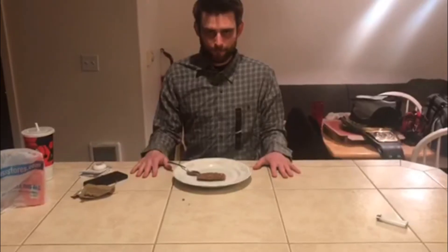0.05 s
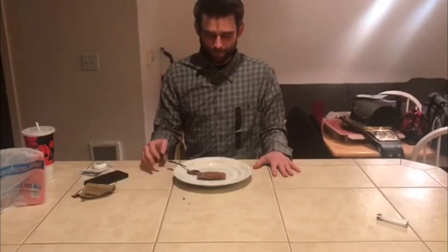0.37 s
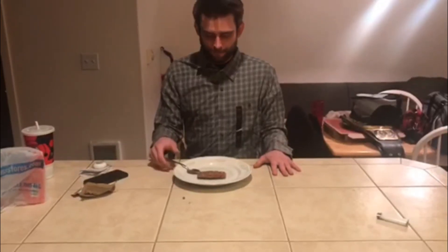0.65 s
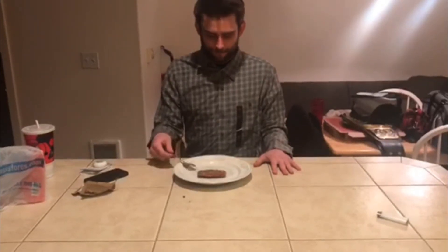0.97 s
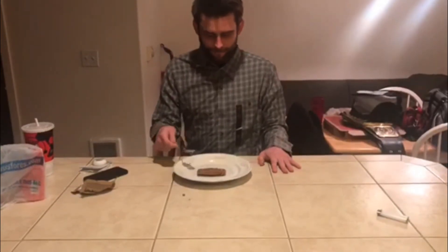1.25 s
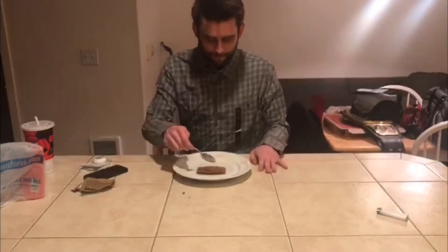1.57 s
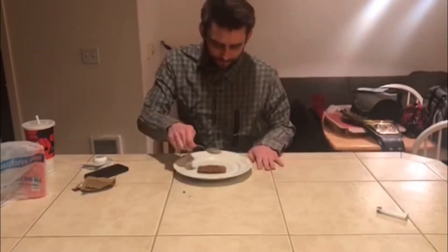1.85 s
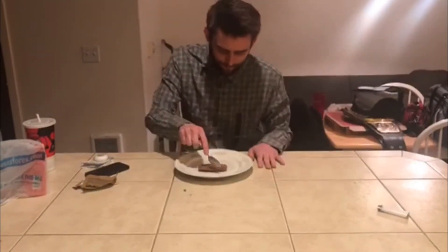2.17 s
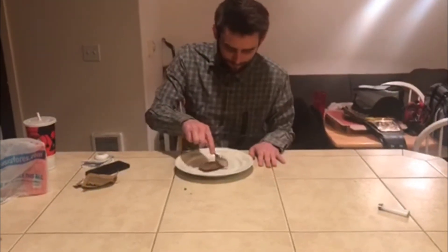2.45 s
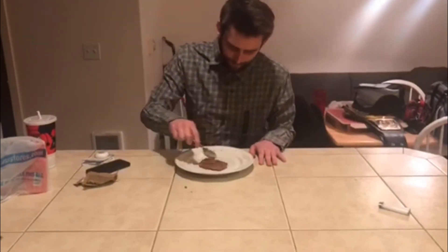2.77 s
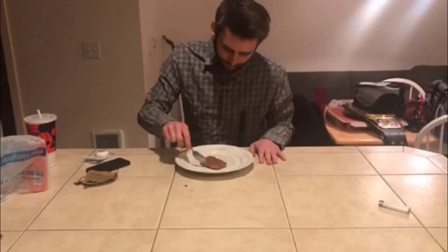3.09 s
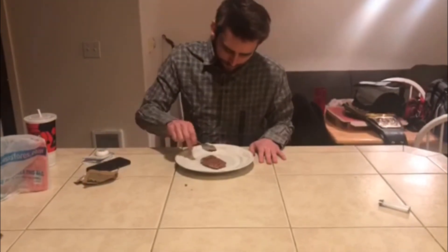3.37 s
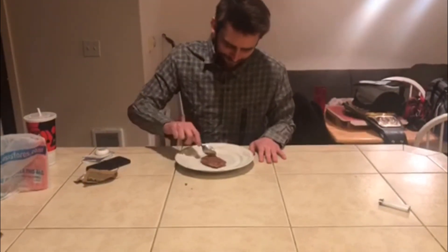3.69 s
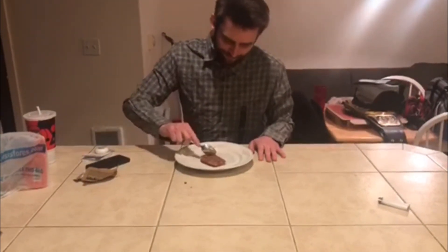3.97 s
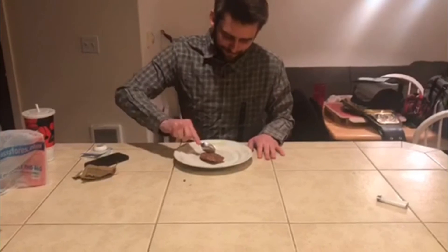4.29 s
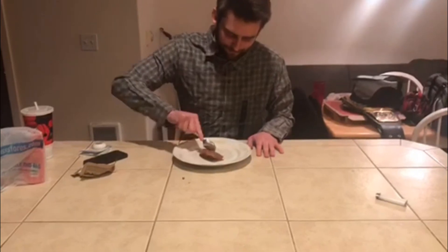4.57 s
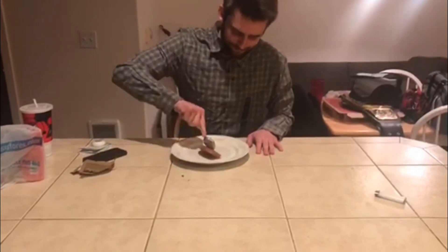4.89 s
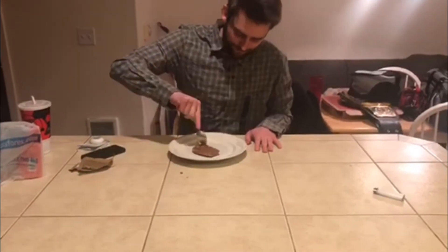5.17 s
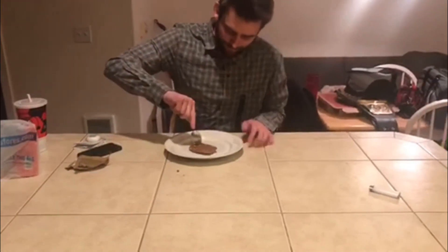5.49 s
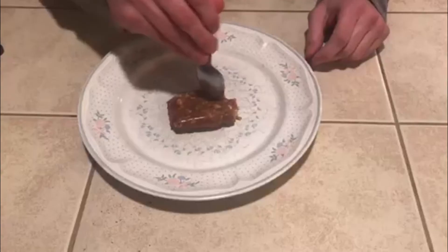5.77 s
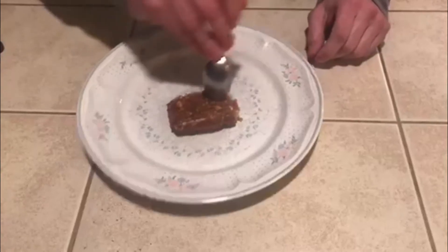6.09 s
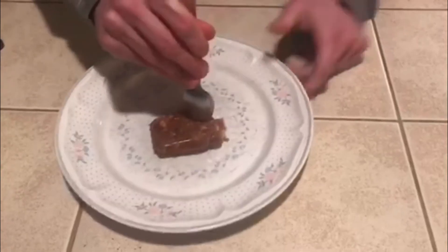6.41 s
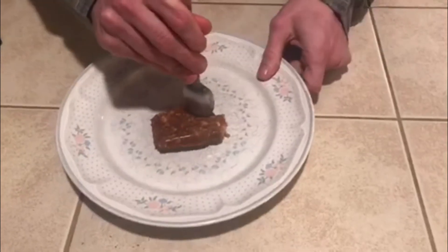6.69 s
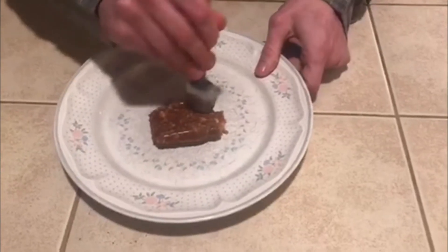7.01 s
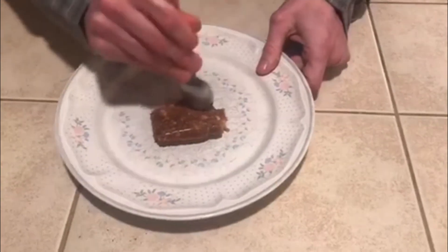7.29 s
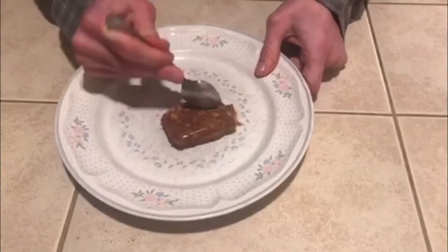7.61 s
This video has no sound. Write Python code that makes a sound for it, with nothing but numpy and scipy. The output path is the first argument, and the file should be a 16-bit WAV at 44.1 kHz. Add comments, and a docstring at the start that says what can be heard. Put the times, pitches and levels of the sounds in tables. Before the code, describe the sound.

A spoon pressed into a hard bar slips and skids on a plate, knocking it against a tiled table, louder toward the end.

```python
"""In a quiet kitchen, a metal spoon knocks and clinks as it is picked up from a ceramic plate.
Sleeves and hands brush. Pushed into a hard bar, the spoon sticks and slips over the glaze, making the
rim sing, and knocks the plate against the tiled table. After five seconds its edge squeaks twice.
For the last two seconds we listen from just above the plate instead of across the table:
the spoon skids hard, a hand steadies the plate, and a run of loud knocks ends the scene."""
import sys
import numpy as np
from scipy import signal
from scipy.fft import rfft, irfft
from scipy.io import wavfile
from scipy.ndimage import uniform_filter1d

SR = 44100
rng = np.random.default_rng(int(sys.argv[2]) if len(sys.argv) > 2 else 0)


def generate_wav(sig):
    """Save sig (samples, or channels by samples) to the path in sys.argv[1] as 16-bit PCM at SR."""
    pcm = np.round(np.clip(np.atleast_2d(sig).T, -1, 1) * 32767).astype(np.int16)
    wavfile.write(sys.argv[1], SR, pcm)


N = 346185
T = np.arange(N) / SR
RING_T = np.arange(SR) / SR   # one second, for single sounds

# Levels are relative. A "t60" is the time a sound left alone takes to fade by 60 dB.
# the tone of the quiet room: f/Hz, level/dB
ROOM_COLOUR = [(15, -40.5), (25, -19.5), (55, 1), (133, -6), (261, -9), (299, -11), (413, -12.5),
               (447, -19), (767, -20.5), (926, -22.5), (1550, -21.5), (1770, -22), (2650, -28.5),
               (10200, -36), (15700, -33)]
# knocks through bar and plate: t/s, plate knock/dB, table thud/dB, spoon tick/dB, hollow note/Hz
KNOCK_HITS = [(0.554, -36.5, -49, -50, 1430), (0.899, -19, -24.5, -54, 860),
              (1.968, -19.5, -20.5, -44.5, 654), (3.107, -21.5, -32.5, -73, 412),
              (3.3, -34, -34.5, -52, 900), (3.775, -14.5, -17, -34.5, 1750), (3.887, -29.5, -23, -42, 1810),
              (3.936, -28, -24.5, -49, 1790), (4.152, -24, -25, -74, 567), (4.187, -13.5, -20.5, -62, 600),
              (5.196, -39, -24.5, -57, 500), (5.503, -25.5, -21.5, -36, 1860), (5.542, -19, -30, -45, 1810),
              (5.584, -24.5, -20, -38, 1060), (5.728, -17, -7.5, -34.5, 464.6),
              (6.051, -45.5, -18, -58, 536), (6.075, -38, -14, -62, 495), (6.115, -36, -26, -45, 1180),
              (7.439, -9, -2, -42, 598), (7.643, -6.5, -7, -17.5, 1053), (7.657, -6.5, -4.5, -26, 890),
              (7.68, -2.5, -3, -19, 640), (7.686, -2, -3, -36, 871)]
# the broad tone of table, plate and spoon: f/Hz, level/dB
TABLE_TONE = [(30, -16), (60, -13), (105, -5.5), (150, 1.5), (280, -2.5), (450, -20.5), (900, -69.5)]
PLATE_TONE = [(120, -42.5), (330, -7), (600, -1), (950, 1), (1700, -2), (2400, -20), (3500, -29.5),
              (7000, -58)]
SPOON_TONE = [(900, -35.5), (2300, -10.5), (4800, -13), (5500, -26), (9000, -34.5), (10200, -39.5),
              (15500, -38.5)]
# fixed resonances of table and room that colour the knocks and skids: f/Hz, width/Hz, level/dB
THUD_RESONANCES = [(150.4, 13, 6), (183.5, 14, 2), (222, 11, -1.5), (306, 36, -3.5)]
KNOCK_RESONANCES = [(372, 22, 3), (496, 22, 3), (603, 40, 8.5), (698, 20, 3), (724, 20, 1), (825, 44, 7.5),
                    (866, 26, 8), (942, 22, 6), (1014, 22, 3), (1125, 55, 3), (1207, 22, 4), (1437, 45, 0),
                    (1690, 90, -7)]
# resonances of the spoon while it is pressed down: f/Hz, width/Hz, level/dB
SPOON_RESONANCES = [(2997, 220, 0.5), (3880, 70, -1.5), (4440, 320, -1), (5080, 98, -10),
                    (6120, 390, -13.5), (6600, 140, -17), (7750, 100, -23.5), (8730, 150, -14),
                    (9290, 84, -17.5), (10900, 130, -20.5), (11340, 130, -10.5), (12700, 130, -17),
                    (13130, 110, -22), (14550, 180, -12), (15500, 100, -19.5)]
# the kitchen's echo, band by band: f/Hz, level/dB, t60/s
ECHO_BANDS = [(125, 0, 0.48), (294.5, 5.5, 0.43), (690, -2.5, 0.48), (1500, -3.5, 0.49), (3660, -4.5, 0.49),
              (7150, -3.5, 0.42), (13300, -1, 0.093)]
# loose touches of spoon on plate: t/s, level/dB, treble limit/Hz
CLINK_HITS = [(0.8935, 1, 19100), (0.9003, -3.5, 17200), (0.919, -3.5, 6080), (5.733, -18, 1840),
              (6.643, -23.5, 2420)]
# notes of the freely ringing spoon: f/Hz, level/dB, t60/s
SPOON_NOTES = [(2890, -10, .45), (2935, -9, .4), (3806, -14, .5), (3850, -14, .45), (4296, -11, .35),
               (4950, -13, .5), (5566, -22, .3), (6035, -11, .45), (6089, -6, .36), (6620, -14, .3),
               (7327, -22, .26), (7760, -16, .34), (8506, -18, .28), (8680, -18, .4), (9250, -8, .26),
               (9305, -12, .26), (10730, -15, .22), (10920, -11, .26), (11235, 0, .22), (11330, -9, .25),
               (12670, -10, .3), (14060, -12, .24), (14640, -9, .26)]
# notes of the plate's rim: f/Hz, level/dB, t60/s, drop straight above the plate/dB
RIM_NOTES = [(1365, 1, .85, 23), (2098, -1, .65, 4)]
# strokes of sleeves and hands: t/s, rise/s, fade to about a third/s, rustle/dB, hiss/dB
BRUSH_STROKES = [(1.718, 0.0067, 0.028, -59.5, -71), (1.863, 0.0027, 0.023, -42.5, -49.5),
                 (1.92, 0.064, 0.017, -57, -65.5), (2.5, 0.053, 0.4, -71, -80.5),
                 (3.725, 0.018, 0.071, -61, -76), (3.985, 0.022, 0.029, -61, -72),
                 (4.22, 0.036, 0.027, -60.5, -77), (4.409, 0.0061, 0.021, -62.5, -84),
                 (5.376, 0.031, 0.073, -56, -61), (5.42, 0.12, 0.11, -62.5, -73.5),
                 (5.836, 0.017, 0.041, -57, -73), (6.448, 0.064, 0.077, -58, -60),
                 (7.57, 0.076, .13, -55, -66.5)]
# the tone of rustling and of fine hiss: f/Hz, level/dB
RUSTLE_TONE = [(200, 0.5), (900, 9), (2400, 3.5), (4500, -0.5), (6500, -4.5), (9000, -23.5), (15000, -24.5)]
HISS_TONE = [(3000, -25.5), (8000, 3.5), (10400, -4.5), (13000, -1.5), (15500, -1)]
# skids over the glaze: t/s, swell/s, ease/s, plate grind/dB, table rumble/dB, spoon rasp/dB
SKID_PUSHES = [(1.812, .033, 0.014, -39, -35.5, -53.5), (3.059, 0.018, 0.041, -58.5, -50.5, -80),
               (4.847, 0.15, 0.066, -37.5, -55.5, -54.5), (5.07, 0.021, 0.1, -34, -48.5, -52),
               (6.171, 0.11, 0.11, -16, -29, -26), (6.709, 0.085, .042, -38, -48, -44.5),
               (7.282, 0.032, 0.037, -48, -64, -54.5), (7.393, 0.036, 0.03, -30.5, -33.5, -39.5),
               (7.558, 0.022, .06, -45.5, -36, -54), (7.779, 0.019, 0.057, -43, -44, -51)]
# squeaks of the spoon's edge: t/s, length/s, start f/Hz, end f/Hz, level/dB
EDGE_SQUEAKS = [(5.398, 0.0306, 2404, 2157, -47.5), (5.701, 0.015, 2350, 2230, -43.5)]

MOVE_CLOSE_S = 5.725   # from here on we listen just above the plate
CUTOFF_HZ = 15800


def from_db(db):
    """Turn decibels into a number to multiply by."""
    return 10 ** (np.asarray(db) / 20)


def unit_energy(response):
    """Scale a response so that white noise keeps its level through it."""
    return response / np.sqrt(np.sum(response ** 2) + 1e-20)


def through(x, response):
    """Play x through an object or room, given its response to one sharp tap."""
    return signal.oaconvolve(x, response)[:len(x)]


def cut(x, kind, hz, order=1):
    """Keep the "low" or "high" side of hz; a higher order cuts more steeply."""
    return signal.sosfilt(signal.butter(order, min(hz, SR / 2 - 1), kind, fs=SR, output="sos"), x)


def add(track, s, sound):
    """Mix a sound into a track at time s."""
    start = int(s * SR)
    track[start:start + len(sound)] += sound[:N - start]


def colour(points, resonances=()):
    """The response to a tap: a broad tone plus resonances, pitches that stand out and ring briefly."""
    hz, db = np.transpose(points)
    grid = np.arange(SR // 2 + 1) + 1
    power = from_db(np.interp(np.log(grid), np.log(hz), db)) ** 2
    for centre, width, peak_db in resonances:
        power = power + (from_db(peak_db) / (1 + (2 * (grid - centre) / width) ** 2)) ** 2
    # make the sound follow right after the tap, never before it (minimum phase)
    cepstrum = irfft(.5 * np.log(power))
    cepstrum[1:SR // 2] *= 2
    cepstrum[SR // 2 + 1:] = 0
    return unit_energy(irfft(np.exp(rfft(cepstrum))))


def room_tone(level_db=-66.5):
    """The low hum of the house under a faint hiss."""
    return from_db(level_db) * through(rng.standard_normal(N), colour(ROOM_COLOUR))


def blow(chatter_s, chatter_db, seat_s=0):
    """A hit and the brief chatter as the surfaces settle; seat_s softens its start."""
    t = RING_T[:SR // 8]
    force = from_db(chatter_db) * unit_energy(rng.standard_normal(len(t)) * np.exp(-t / chatter_s))
    force[0] += 1
    seating = 1 - np.exp(-(t + .001) / (seat_s + 1e-9))
    return unit_energy(force * seating)


def free_ring(notes, flutter=0):
    """Fading notes set off together; flutter makes each waver as the ringing thing turns."""
    out = 0
    for hz, db, t60, *_ in notes:
        sway = signal.resample(rng.standard_normal(45) + 1j * rng.standard_normal(45), 900)
        sway = np.interp(RING_T, np.linspace(0, 1, len(sway)), sway)
        wave = (1 + flutter * sway) * np.exp(2j * np.pi * (hz * RING_T + rng.random()))
        out = out + from_db(db - 60 * RING_T / t60) * wave.real
    return unit_energy(out)


def knocks(usual_tick_db=-21.5, db_per_doubling=25.5):
    """Blows on table, plate and spoon; each spot that is hit has its own short hollow note."""
    table, plate, spoon, note = np.zeros((4, N))
    for s, knock_db, thud_db, tick_db, hz in KNOCK_HITS:
        # the more the bar cushions a blow, the fainter its tick and the duller and slower its knock
        hardness = 2 ** ((tick_db - knock_db - usual_tick_db) / db_per_doubling)
        top_hz = np.clip(2560 * hardness, 1100, 3500)
        force = blow(chatter_s=.0096, chatter_db=3.5, seat_s=.00088 / hardness ** 2)
        hollow = from_db(-3.5) * free_ring([(hz, 0, .045), (hz * 1.07, -2, .035)])
        add(table, s, from_db(thud_db) * force)
        add(plate, s, from_db(knock_db) * cut(force, "low", top_hz, order=4))
        add(spoon, s, from_db(tick_db) * blow(chatter_s=.0025, chatter_db=5))
        add(note, s, from_db(knock_db) * cut(hollow, "low", top_hz, order=4))
    return np.array([table, plate, cut(spoon, "low", 6900, order=2)]), note


def pressed_spoon(grind, rumble, rasp, grip_fade_s=.078):
    """Knocks and skids stir resonances of table, room and spoon; the grip cuts the spoon's ring short."""
    blows, note = knocks()
    on_table, on_plate, on_spoon = skids(grind, rumble, rasp) + blows
    thud = through(on_table, colour(TABLE_TONE, THUD_RESONANCES))
    knock = through(on_plate, colour(PLATE_TONE, KNOCK_RESONANCES))
    spoon = from_db(-1) * through(on_spoon, colour(SPOON_TONE, SPOON_RESONANCES))
    gripped = free_ring(SPOON_NOTES, flutter=.5) * np.exp(-RING_T / grip_fade_s)
    # the grip is looser early on and lets more of the ring through
    looseness = from_db(np.where(T < MOVE_CLOSE_S, .5, -9))
    ring = through(cut(on_spoon * looseness, "low", 4200), gripped)
    return thud + knock + spoon + note + ring


def kitchen_echo():
    """Many reflections blur into fading noise; the highest treble dies first."""
    hz, db, t60 = np.transpose(ECHO_BANDS)
    edges = np.concatenate([[50], np.sqrt(hz[1:] * hz[:-1]), [CUTOFF_HZ]])
    tail = 0
    for k in range(len(hz)):
        band_filter = signal.butter(3, edges[k:k + 2], "band", fs=SR, output="sos")
        band = signal.sosfilt(band_filter, rng.standard_normal(SR))
        fade = unit_energy(from_db(-60 * RING_T / t60[k]) * (RING_T > .004))
        tail = tail + from_db(db[k]) * band * fade
    return tail


def clinks(spoon_fade_s=.053, plate_fade_s=.24):
    """The loosely held spoon bounces on the plate; both ring until the fingers quiet them."""
    out = np.zeros(N)
    crack = (from_db(-10.5) * colour(SPOON_TONE, SPOON_RESONANCES)
             + from_db(-12) * cut(colour(PLATE_TONE), "high", 890)
             + from_db(-12) * colour(HISS_TONE))
    for s, db, top_hz in CLINK_HITS:
        spoon = from_db(2.5) * free_ring(SPOON_NOTES, flutter=.8) * np.exp(-RING_T / spoon_fade_s)
        plate = from_db(-7.5) * free_ring(RIM_NOTES, flutter=.35) * np.exp(-RING_T / plate_fade_s)
        touch = spoon + plate + through(crack, blow(chatter_s=.027, chatter_db=15.5))
        add(out, s, from_db(db) * cut(touch, "low", top_hz, order=2))
    return out


def stick_slip(slips_per_s, unevenness, spread_db, grit_db):
    """Rubbing surfaces catch and let go: uneven little jerks over fine grit, at a steady level."""
    gaps, sizes = rng.standard_normal((N // 16, 2)).T
    at = np.cumsum(np.exp(unevenness * gaps) * SR / slips_per_s).astype(int)
    slips = np.zeros(N)
    slips[at[at < N]] = from_db(spread_db * np.clip(sizes[at < N], -2, 2))
    force = (slips - slips.mean()) / slips.std() + from_db(grit_db) * rng.standard_normal(N)
    return force / np.sqrt(uniform_filter1d(force ** 2, size=500))


def brushes():
    """Cloth and skin slide: countless tiny touches, in strokes that rise and fade away."""
    rustle, hiss = np.zeros((2, N))
    for s, rise_s, fade_s, rustle_db, hiss_db in BRUSH_STROKES:
        stroke = np.minimum(RING_T / rise_s, 1) * np.exp(-np.maximum(RING_T - rise_s, 0) / fade_s)
        add(rustle, s, from_db(rustle_db) * stroke)
        add(hiss, s, from_db(hiss_db) * stroke)
    fibres = stick_slip(slips_per_s=1800, unevenness=.7, spread_db=5, grit_db=3)
    return through(rustle * fibres, colour(RUSTLE_TONE)) + through(hiss * fibres, colour(HISS_TONE))


def pushes(bite_s=.033, swell_db_per_s=165.5, ease_db_per_s=168, lift_s=.029):
    """Strength of grind, rumble and rasp: the edge bites, the push swells and eases, the edge lifts."""
    out, t = np.zeros((3, N)), RING_T
    for start, swell_s, ease_s, grind_db, rumble_db, rasp_db in SKID_PUSHES:
        push_db = -np.maximum(swell_db_per_s * (swell_s - t), ease_db_per_s * (t - swell_s))
        contact = np.clip(t / bite_s, 0, 1) ** 2 * np.clip((swell_s + ease_s - t) / lift_s, 0, 1)
        # rumble and rasp follow the push only partly
        levels = grind_db + push_db, rumble_db + .46 * push_db, rasp_db + .76 * push_db
        for track, db in zip(out, levels):
            add(track, start, contact * from_db(db))
    return out


def skids(grind, rumble, rasp):
    """Rubbing forces on table, plate and spoon; a harder skid has sharper, weightier slips."""
    force = stick_slip(slips_per_s=500, unevenness=.6, spread_db=4.5, grit_db=-3)
    sharpness = (rasp / rasp.max()) ** .4
    light = cut(cut(force, "low", 1600), "high", 450)
    on_plate = np.sqrt(sharpness) * force + (1 - np.sqrt(sharpness)) * light
    on_spoon = sharpness * force + (1 - sharpness) * cut(force, "low", 8500)
    on_table = cut(force, "high", 125, order=5)
    return np.array([rumble * on_table, grind * on_plate, rasp * on_spoon])


def singing_rim(grind, hand_on_plate_s=6.42):
    """The rim stores the energy of the grinding and sings on until a hand steadies the plate."""
    out = 0
    for hz, db, t60, drop_db in RIM_NOTES:
        keep = from_db(-120 / (t60 * SR))   # share of the energy left after each sample
        drive = grind * from_db(db - drop_db * (T >= MOVE_CLOSE_S))
        energy = signal.lfilter([1 - keep], [1, -keep], drive ** 2 + 1e-18)
        # slips jostle the wave only while they last
        jostle = np.cumsum(rng.standard_normal(N) * (grind > 1e-5)) * .012
        out = out + np.sqrt(2 * energy) * np.sin(2 * np.pi * hz * T + jostle)
    steadied = np.exp(-np.maximum(T - hand_on_plate_s, 0) / .04)
    return from_db(-14) * out * steadied


def squeaks():
    """For a moment the slips lock into a falling, unsteady tone."""
    out = np.zeros(N)
    for s, length, start_hz, end_hz, db in EDGE_SQUEAKS:
        n = int(length * SR)
        hz = np.linspace(start_hz, end_hz, n) * (1 + .36 * rng.standard_normal(n))
        add(out, s, from_db(db) * np.hanning(n) * np.sin(2 * np.pi * np.cumsum(hz) / SR))
    return out


def scene():
    """Mix it all; close to the plate the direct sound is louder, the echo weaker and duller."""
    grind, rumble, rasp = pushes()
    dry = pressed_spoon(grind, rumble, rasp) + clinks() + squeaks() + brushes()
    close, far = T >= MOVE_CLOSE_S, from_db(-4) * dry
    direct = np.where(close, dry, far)
    narrowed = cut(cut(dry, "low", 2500), "high", 260)
    to_room = np.where(close, from_db(-7.5) * narrowed, far)
    echo = through(to_room, kitchen_echo())
    return (direct + echo + singing_rim(grind) + room_tone())[None]


def record(dry):
    """Cut off the very highest treble steeply."""
    return signal.sosfilt(signal.ellip(12, .1, 80, CUTOFF_HZ, fs=SR, output="sos"), dry)


dry = scene()
out = record(dry)
generate_wav(out)
```